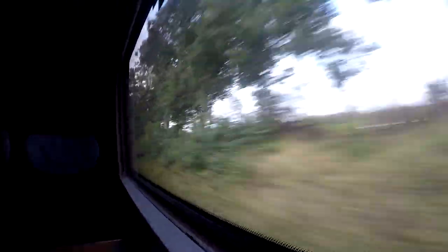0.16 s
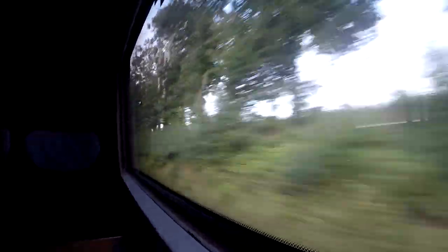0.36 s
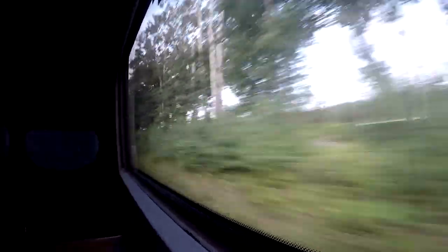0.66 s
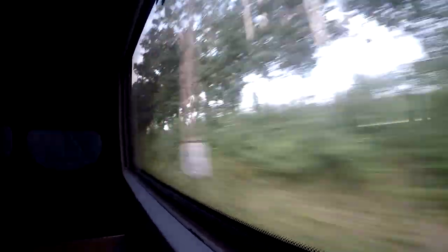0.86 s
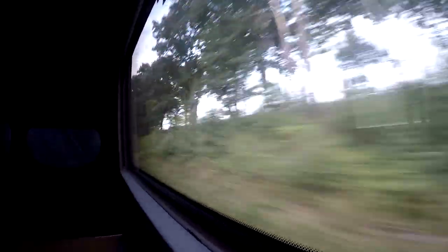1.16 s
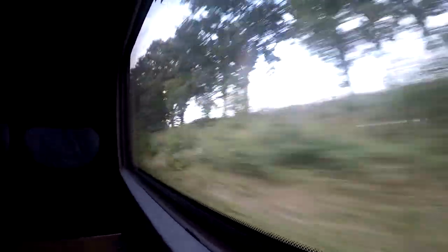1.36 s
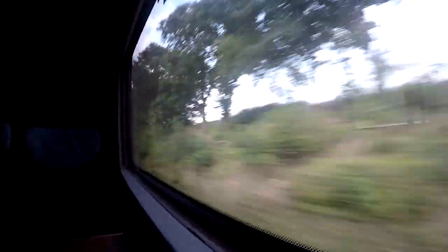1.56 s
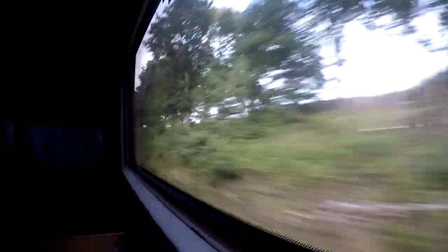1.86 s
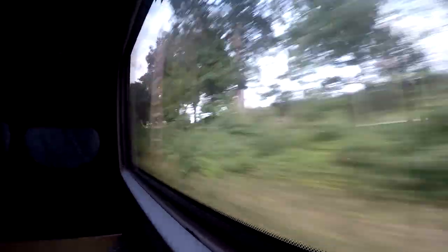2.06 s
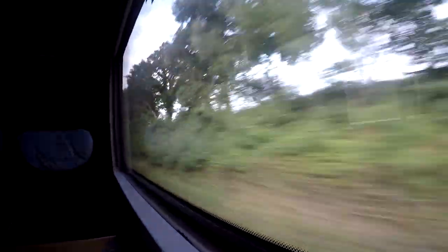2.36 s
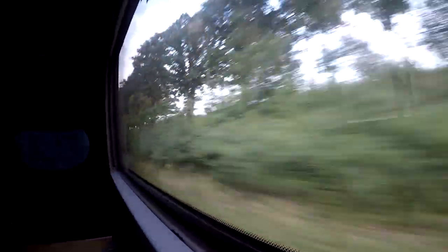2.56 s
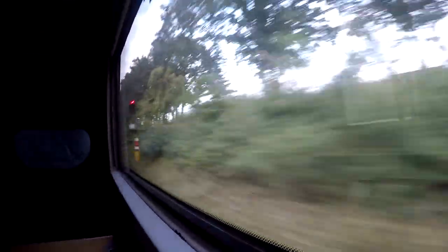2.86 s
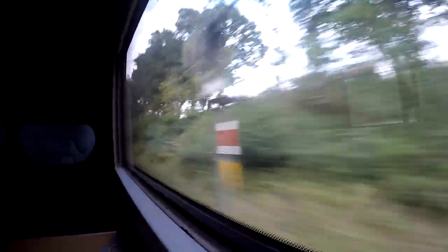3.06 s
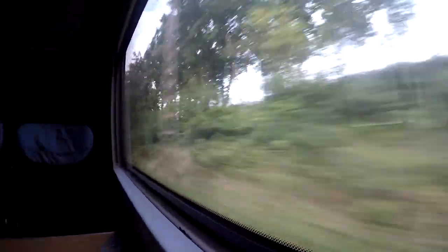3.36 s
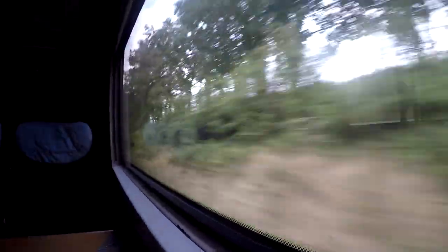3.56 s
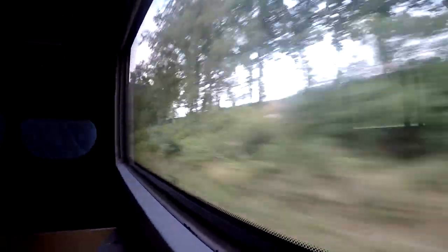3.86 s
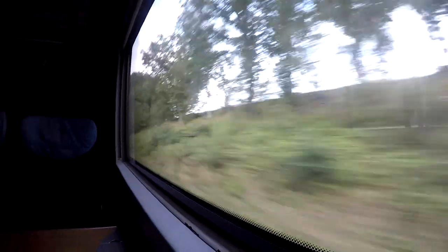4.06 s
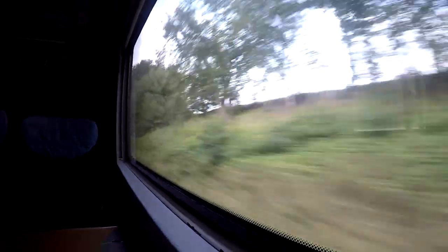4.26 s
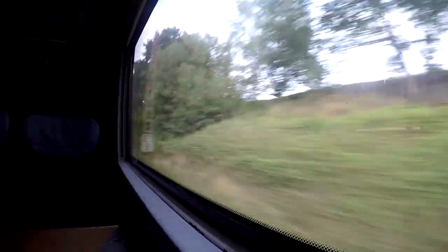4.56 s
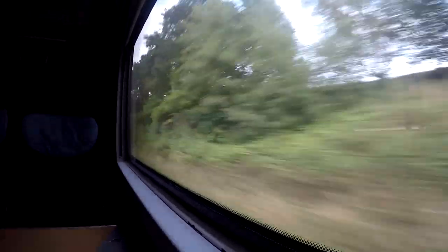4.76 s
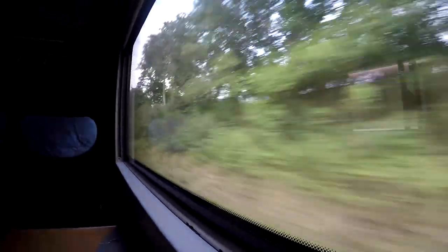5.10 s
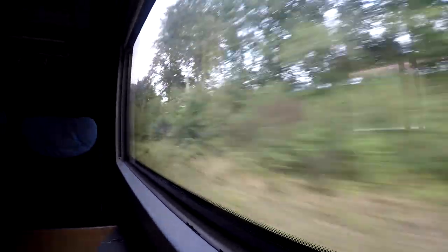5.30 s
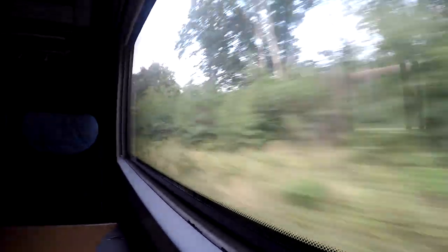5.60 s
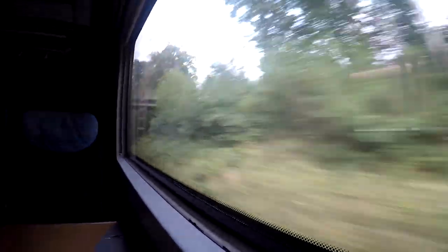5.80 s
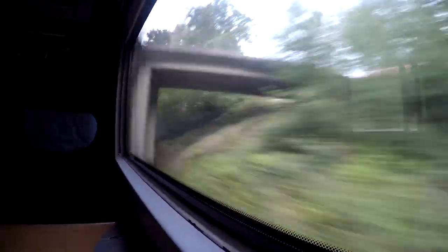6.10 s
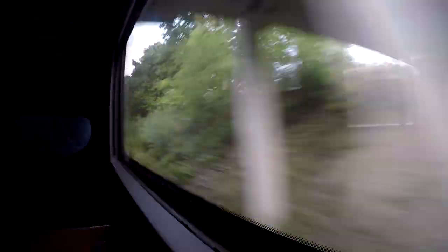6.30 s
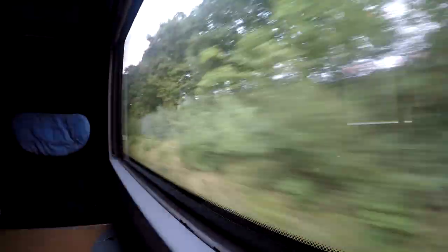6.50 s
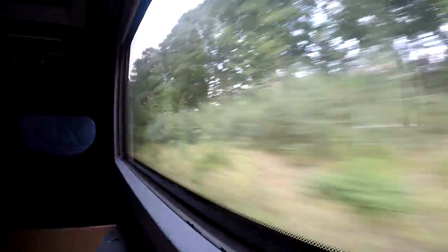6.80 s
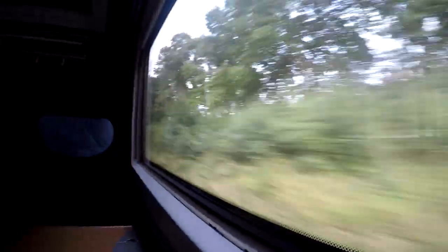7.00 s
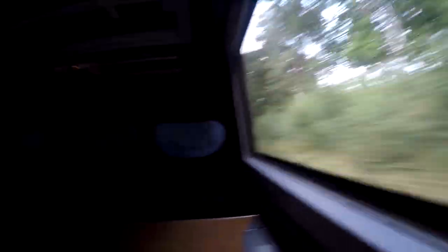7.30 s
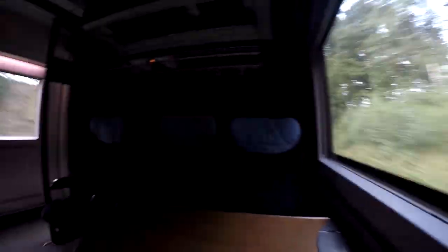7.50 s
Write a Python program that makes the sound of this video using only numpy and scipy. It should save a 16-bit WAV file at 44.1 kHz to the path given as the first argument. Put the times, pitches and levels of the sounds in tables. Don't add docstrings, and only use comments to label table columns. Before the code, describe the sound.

Deep smooth rolling roar of a speeding train heard from a passenger seat, bass humming and wavering while fittings softly knock, snap and tick.

```python
import sys
import numpy as np
from scipy import signal
from scipy.io import wavfile
from scipy.ndimage import uniform_filter1d

SR = 44100
rng = np.random.default_rng(int(sys.argv[2]) if len(sys.argv) > 2 else 0)


def digitize_waveform(pressure):
    field = np.atleast_2d(pressure).T
    bounded = np.clip(field, -1, 1)
    quanta = np.round(bounded * 32767).astype(np.int16)
    wavfile.write(sys.argv[1], SR, quanta)


def decibels_to_gain(level_db):
    exponent = np.asarray(level_db, float) / 20
    return 10 ** exponent


N = 337365


def evened(x):
    return x / np.sqrt(np.mean(x ** 2) + 1e-20)


def along(rows):
    s, *columns = np.transpose(rows)
    return [np.interp(np.arange(N) / SR, s, column) for column in columns]


def changes(rows):
    t = np.arange(N) / SR
    return sum(np.interp(t, [start_s - onset_s, start_s, start_s + recovery_s], [0, change_db, 0])
               for start_s, change_db, onset_s, recovery_s in rows)


def wander(size):
    return evened(uniform_filter1d(rng.standard_normal(N), size))


def band(x, lo_hz, hi_hz):
    return signal.sosfilt(signal.butter(2, [lo_hz, hi_hz], "band", fs=SR, output="sos"), x)


def resonate(x, hz, width_hz):
    turn = np.exp(2j * np.pi * hz * np.arange(len(x)) / SR)
    pole = np.exp(-np.pi * width_hz / SR)
    smoothed = signal.lfilter([(1 - pole) ** 2], [1, -2 * pole, pole ** 2], x / turn)
    return 2 * (turn * smoothed).real


def rung(x, modes, detune=1):
    return sum(decibels_to_gain(db) * evened(resonate(x, hz * detune, width_hz)) for hz, width_hz, db in modes)


def noise(spectrum, size, patchy_db, flicker_db):
    frames, hz = 4 * N // size + 6, np.fft.rfftfreq(size, 1 / SR)
    real, imag, patches = rng.standard_normal((frames, len(hz), 3)).T
    patches = uniform_filter1d(patches, size=9, axis=0)
    patches = evened(uniform_filter1d(patches, size=8, axis=1))
    flicker = evened(uniform_filter1d(rng.standard_normal(frames), size=3))
    f, db = np.transpose(spectrum)
    shape_db = np.interp(np.log(hz + 1), np.log(f + 1), db, left=-120, right=-120)
    level_db = shape_db[:, None] + patchy_db * patches + flicker_db * flicker
    z = (real + 1j * imag) * decibels_to_gain(level_db)
    return evened(signal.istft(z, nperseg=size, noverlap=3 * size // 4)[1][:N])


def body_tone(hz, db):
    phase = 2 * np.pi * (np.cumsum(hz * np.ones(N)) / SR + rng.random())
    return np.sqrt(2) * decibels_to_gain(db) * np.cos(phase), phase


def floor_drone():
    # start_s, pitch_hz, level_db
    drone_curve = [(0.0, 90.6, -19.5), (0.3, 92.4, -19.5), (0.64, 92.64, -24.5), (1.04, 92.9, -18.5),
                   (2.11, 91.7, -21.5), (2.28, 95.04, -31.5), (2.43, 91.3, -20), (2.47, 90.7, -12),
                   (2.8, 92.1, -19), (3.75, 92.2, -15.5), (4.37, 92.1, -17.5), (4.52, 89.3, -24),
                   (4.57, 90, -11), (4.67, 92.3, -26.5), (5.05, 92.2, -16.5), (6.4, 92.04, -17),
                   (7.11, 93.16, -17), (7.65, 93.4, -16.5)]
    # start_s, change_db, onset_s, recovery_s
    drone_slips = [(1.11, -17, .06, 0.072), (1.3, -14, .13, .08), (1.43, -11.5, .05, .1),
                   (2.81, -6, 0.17, 0.0089), (3.0, 4, 0.031, .07), (3.96, -9.5, 0.091, .04),
                   (4.01, 2, .02, 0.23), (4.36, -3, 0.06, 0.045), (4.92, -3.5, 0.019, 0.073),
                   (5.45, -7, 0.052, 0.37), (6.01, -8.5, .13, .04), (6.14, -9, 0.073, 0.15),
                   (6.71, -17, 0.045, .15), (6.97, -10.5, .1, 0.017), (7.03, -8, .04, .08)]
    pitch_hz, level_db = along(drone_curve)
    return body_tone(pitch_hz, level_db + changes(drone_slips))


def wall_hum():
    # start_s, change_db, onset_s, recovery_s
    hum_lapses = [
        (0.15, -6, 0.26, 0.45),
        (0.95, -9, 0.19, 0.33),
        (2.4, -4, 0.51, .5),
        (2.75, -15.5, 0.079, 0.11),
        (3.17, 0, 0.19, 0.051),
        (4.62, -20, .02, 0.05),
        (4.66, -2.5, 0.023, 0.35),
        (6.03, -8.5, .15, 0.26),
        (6.5, -7, .35, 0.094),
        (7.03, -6.5, .08, .08),
    ]
    return body_tone(162.14 + 0.41 * wander(size=8000), -28.5 + changes(hum_lapses))[0]


def body_sway():
    # start_s, change_db, onset_s, recovery_s
    sway_lulls = [(0.0, -7.5, .02, 0.073), (0.35, -12.5, 0.1, .04), (1.7, -5, .04, .12),
                  (2.45, -16, .15, 0.054), (2.67, -12.5, .1, 0.21), (3.11, -15.5, .07, 0.14),
                  (3.7, -10, 0.7, .5), (4.33, -9, .09, 0.27), (5.03, -9, 0.19, 0.29), (5.6, -15, .05, 0.16),
                  (5.78, -11.5, 0.11, 0.15), (6.14, -3.5, .2, 0.34), (6.52, -8.5, .06, .2),
                  (6.78, -5.5, .05, .08), (7.48, -21, 0.064, 0.11)]
    return body_tone(21.05 + 1.5 * wander(size=5000), -15 + changes(sway_lulls))[0]


def track_db():
    # start_s, level_db
    track_curve = [(0.0, -39), (1.09, -40), (1.89, -38), (2.24, -41), (2.83, -42.5), (2.96, -40),
                   (3.58, -39), (3.86, -40), (4.47, -39), (4.67, -39), (6.99, -39.5), (7.65, -41.5)]
    db = along(track_curve)[0]
    return db - db.mean()


def axle_and_coach_rings():
    # pitch_hz, width_hz, level_db
    axle_modes = [(10.9, 2.5, -33), (32.2, 5.4, -27.5), (51.04, 3.6, -37), (101.75, 1, -36),
                  (117.35, 8.2, -44), (146, 4.1, -48.5), (477.3, 2.7, -53)]
    # pitch_hz, width_hz, level_db
    coach_modes = [(181.4, 8, -43), (283.4, 17, -47.5), (363.8, 14, -50), (397.7, 21, -53),
                   (530.6, 90, -51), (721, 38, -66.5), (903, 20, -63.5), (1004, 65, -63.5)]
    track_share = 0.45
    return decibels_to_gain(track_share * track_db()) * rung(rng.standard_normal(N), axle_modes + coach_modes)


def rolling_roar():
    # pitch_hz, density_db_per_hz
    roar_spectrum = [(3, -45), (12, -8.5), (25, -3), (42, -4), (62, -19), (88, -10.5), (115, -15.5),
                     (152, -20), (175, -25), (230, -29), (520, -36.5), (720, -46.5), (1050, -52.5),
                     (1400, -64.5)]
    level_db, track_share = -19.5, 0.9
    roar = noise(roar_spectrum, size=8192, patchy_db=-0.64, flicker_db=0.5)
    return decibels_to_gain(level_db + track_share * track_db()) * roar


def contact_level():
    # start_s, end_s, level_db
    buzz_spells = [(0.0, 0.25, -61.5), (0.398, 0.509, -61), (0.572, 0.738, -65), (0.851, 1.158, -64),
                   (1.415, 1.464, -63), (1.553, 1.797, -66), (2.037, 2.176, -66), (2.599, 2.728, -65.5),
                   (2.844, 3.348, -64.5), (3.347, 3.907, -62), (3.903, 4.53, -65), (4.593, 4.819, -66.5),
                   (4.953, 5.509, -66.5), (5.54, 6.232, -68), (6.349, 6.851, -66), (7.127, 7.386, -70.5),
                   (7.519, 7.7, -69)]
    edge_s, rest_db = 0.05, -84
    t = np.arange(N) / SR
    gain = decibels_to_gain(rest_db)
    for start_s, end_s, level_db in buzz_spells:
        inside_s = np.minimum(t - start_s, end_s - t)
        gain = gain + decibels_to_gain(level_db) * np.clip(inside_s / edge_s + 0.5, 0, 1)
    return gain


def fizz_bursts_db():
    # start_s, change_db, onset_s, recovery_s
    fizz_bursts = [(0.0, 22, .01, 0.015), (0.21, 2.8, .15, .1), (0.4, 3.7, .04, 0.053), (0.72, 3.3, .1, .3),
                   (2.11, 2.82, 0.32, 0.16), (2.555, 6.7, .05, .06), (4.2, 2.79, .15, .25),
                   (4.74, 7, 0.16, 0.051), (5.47, 3.9, .2, 0.09), (5.94, 6.1, .06, 0.035),
                   (6.47, 5, 0.035, .03), (7.27, 4, 0.14, .05), (7.39, 4, 0.098, .08),
                   (7.65, 13.7, .02, .01)]
    return changes(fizz_bursts)


def seal_hiss():
    # pitch_hz, density_db_per_hz
    hiss_spectrum = [(760, -28.5), (1300, -6), (1470, -2.5), (1750, 1), (1900, -0.5), (2900, 0),
                     (3170, -1.5), (3490, -3), (4980, -6), (6150, -11), (9000, -23.5), (11700, -47.5),
                     (19800, -120)]
    level_db, track_share, loose_db, burst_share = -58.5, 0.43, 1.5, 0.41
    loose = uniform_filter1d(np.sqrt(contact_level()), size=4000)
    hiss_db = level_db + track_share * track_db()
    hiss_db = hiss_db + loose_db * (loose / loose.mean() - 1)
    hiss_db = hiss_db + burst_share * np.minimum(fizz_bursts_db(), 8)
    return decibels_to_gain(hiss_db) * noise(hiss_spectrum, size=512, patchy_db=1.25, flicker_db=0.55)


def trim_buzz(phase):
    # pitch_hz, width_hz, level_db
    trim_modes = [(3190, 40, -9), (3065, 22, -8), (2035, 30, -8), (4888, 30, -16), (6550, 120, -16),
                  (5000, 300, -11)]
    strip_pitches = (3222, 3266)
    strip_wander_hz, contact_phase_rad = 18, 1.2
    shifted = phase - contact_phase_rad
    cycle = (shifted // (2 * np.pi)).astype(int)
    strength = decibels_to_gain(3.4 * rng.standard_normal(N // 100))[cycle]
    contact = 0.043 + strength * np.exp(3.4 * (np.cos(shifted - np.pi) - 1))
    pair = sum(np.cos(2 * np.pi * np.cumsum(hz + strip_wander_hz * wander(size=1400)) / SR)
               for hz in strip_pitches)
    strips = evened((1.2 + uniform_filter1d(contact, size=300)) * pair)
    return contact_level() * (strips + rung(contact * rng.standard_normal(N), trim_modes))


def motor_whine():
    # start_s, change_db, onset_s, recovery_s
    whine_swells = [
        (0.17, 8.9, .2, 0.14),
        (1.02, 3.4, 0.42, .2),
        (1.87, 9.1, 0.49, .25),
        (2.51, 8.66, .15, .15),
        (2.9, 6.4, .2, .17),
        (3.7, 4.09, 0.35, .2),
        (5.1, 10, 1.1, 1),
        (6.22, 7.3, 0.099, .2),
        (7.6, 8.8, 1.225, .3),
    ]
    pitch_hz, level_db = 1786, -75
    turns = np.cumsum(pitch_hz + 1.5 * wander(size=4000)) / SR
    return decibels_to_gain(level_db + changes(whine_swells) + 1.4 * wander(size=2500)) * np.cos(2 * np.pi * turns)


def treble_gate(x):
    from_hz, to_hz, full_depth = 9000, 14000, 1.3
    hz, _, z = signal.stft(x, SR, nperseg=256, noverlap=192)
    power = uniform_filter1d(abs(z) ** 2, size=5, axis=0)
    power = uniform_filter1d(power, size=6, axis=1)
    level_db = 10 * np.log10(power + 1e-20)
    under_db = np.clip(level_db - np.median(level_db, axis=1, keepdims=True), -14, 0)
    depth = full_depth * np.clip((hz - from_hz) / (to_hz - from_hz), 0, 1)
    return signal.istft(z * decibels_to_gain(depth[:, None] * under_db), SR, nperseg=256, noverlap=192)[1][:N]


def microphone_fizz(pressure):
    # pitch_hz, density_db_per_hz
    fizz_spectrum = [(5000, -7.5), (8000, -2), (10000, -1.5), (12500, -4), (14800, -3.5), (15300, -12)]
    level_db, track_share = -71, 0.6
    strain = evened(0.6 + uniform_filter1d(abs(pressure), size=100))
    fizz = treble_gate(strain * noise(fizz_spectrum, size=256, patchy_db=1.6, flicker_db=1.0))
    return decibels_to_gain(level_db + track_share * track_db() + fizz_bursts_db()) * fizz


def clock_gain():
    image_levels = [-72, -73, -77, -79]
    clock_hz = 3900
    turns = clock_hz * np.arange(N) / SR
    return sum(2 * decibels_to_gain(db) * np.cos(2 * np.pi * harmonic * turns)
               for harmonic, db in enumerate(image_levels, 1))


def ticks():
    ticks_per_s, level_db, t60_s = 120, -79.5, 0.03
    busy = decibels_to_gain(3.0 * wander(size=6000) + 1.6 * np.minimum(fizz_bursts_db(), 8))
    sizes = decibels_to_gain(2.5 * np.minimum(rng.exponential(1, N), 3))
    sizes = sizes * (rng.random(N) < busy * ticks_per_s / SR)
    t = np.arange(1500) / SR
    creaks = rng.standard_normal(N) * signal.oaconvolve(sizes, decibels_to_gain(-60 * t / t60_s))[:N]
    return decibels_to_gain(level_db) * evened(band(creaks, 4000, 12000))


def knocks():
    # pitch_hz, width_hz, level_db
    panel_modes = [(2087, 140, -2), (2360, 790, -1), (1780, 870, -4)]
    # pitch_hz, width_hz, level_db
    frame_modes = [(2830, 580, 0.084), (3640, 190, -0.15), (4180, 570, -1.5)]
    # start_s, panel_peak_db, thud_db, frame_db, treble_db
    heavy_knocks = [(0.2284, -51, 11, 6, 0.5), (0.9428, -55.5, 21.5, -12, -19),
                    (1.0705, -45, 16.5, 3.5, -6), (1.5, -43.5, 10, -7, -23), (1.858, -33.5, 8, -12, -11.5),
                    (1.991, -47.5, 11, -9, -5.5), (2.0188, -42.5, 9, -1, -10),
                    (2.4842, -35.5, 9.5, -13, -13.5), (3.1666, -42, 8, 2.5, -8),
                    (4.4135, -47, 16.5, 7.5, -9.5), (4.4506, -50.5, 7.5, 4.5, 1.5),
                    (4.7584, -46.5, 10, -5, -9.5), (6.2131, -30.5, 6.5, -8, -20),
                    (6.3734, -51.5, 20, 6.5, -8), (7.0991, -44, 2.5, -3, -18),
                    (7.3486, -42.5, 10.5, 1, -16)]
    # start_s, panel_peak_db, frame_db, treble_db
    light_knocks = [(0.3894, -58, 0, -3), (0.5034, -59.5, -6, 13.5), (0.6285, -45, -8, -14),
                    (2.373, -44, -2, -5), (2.523, -48.5, -2, -5.5), (2.7764, -49.5, -8, -13),
                    (3.2714, -51, 6, 0.5), (3.3797, -49, 1.5, -6.5), (3.9644, -49, 11.5, -1.5),
                    (4.2694, -48, 3, -4.5), (5.3094, -53.5, 9, -1.5), (5.437, -45, 1.5, -7),
                    (5.5994, -49, 1, -19), (5.8234, -47.5, 1, -3.5), (6.7396, -55, 7, -6),
                    (7.194, -52, 0, -9), (7.257, -54, 4, -5.5)]
    heavy_t60_s, light_t60_s, light_thud_db = 0.14, 0.17, 3
    blows = [(*row, heavy_t60_s) for row in heavy_knocks]
    blows += [(start_s, peak_db, light_thud_db, frame_db, treble_db, light_t60_s)
              for start_s, peak_db, frame_db, treble_db in light_knocks]
    out, t = np.zeros(N + SR), np.arange(SR // 6) / SR
    for start_s, peak_db, thud_db, frame_db, treble_db, t60_s in blows:
        burst, detune = rng.standard_normal((4, len(t))), rng.uniform(0.96, 1.03)
        panel = evened(rung(burst[0], panel_modes, detune))
        frame = decibels_to_gain(frame_db) * evened(rung(burst[1], frame_modes, detune))
        thud = decibels_to_gain(thud_db + 4.0) * evened(band(burst[2], 420, 840)) * (1 - np.exp(-t / 0.0042))
        edge = decibels_to_gain(treble_db + 4.0 - 15 * t / t60_s) * evened(resonate(burst[3], 5300, 2600))
        crack = 1 + 1.3 * np.exp(-t / 0.005)
        decay = decibels_to_gain(peak_db - 13.5 - 60 * np.maximum(t - 0.008, 0) / t60_s)
        shape = (1 - np.exp(-t / 0.001)) * crack * decay
        at = round((start_s - 0.0008) * SR)
        out[at:at + len(t)] += shape * (panel + frame + thud + edge)
    return out[:N]


def snaps():
    # start_s, peak_db
    snap_peaks = [
        (0.2315, -38),
        (0.5053, -39),
        (2.3726, -44),
        (3.965, -27),
        (5.3018, -42),
        (5.824, -46),
    ]
    out = np.zeros(N)
    impulse = band(band(signal.unit_impulse(300), 2300, 6350), 2000, 7200)
    for start_s, peak_db in snap_peaks:
        at = round((start_s + 0.0008) * SR)
        out[at:at + 300] += decibels_to_gain(peak_db + 15.5) * impulse
    return out


def scene():
    drone, phase = floor_drone()
    tones = drone + wall_hum() + body_sway() + axle_and_coach_rings() + motor_whine()
    washes = rolling_roar() + seal_hiss()
    fittings = trim_buzz(phase) + ticks() + knocks() + snaps()
    return (tones + washes + fittings)[None]


def low_pass(x):
    return signal.sosfilt(signal.butter(12, 15690, fs=SR, output="sos"), x)


def record(dry):
    knee = 0.72
    limited = dry / (1 + (abs(dry) / knee) ** 6) ** (1 / 6)
    heard = limited * (1 + clock_gain()) + microphone_fizz(limited[0])
    ends = signal.windows.tukey(N, 0.0016)
    return low_pass(heard * ends)


dry = scene()
out = record(dry)
digitize_waveform(out)
```